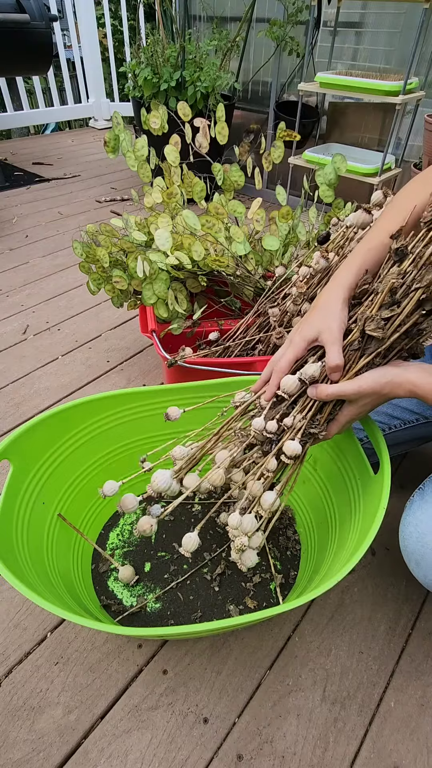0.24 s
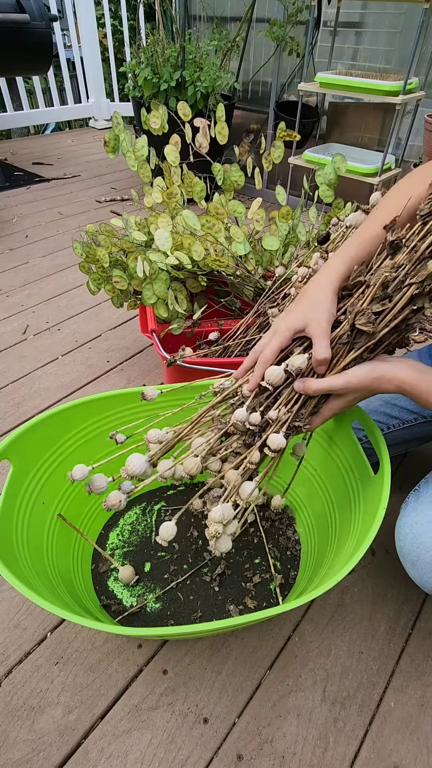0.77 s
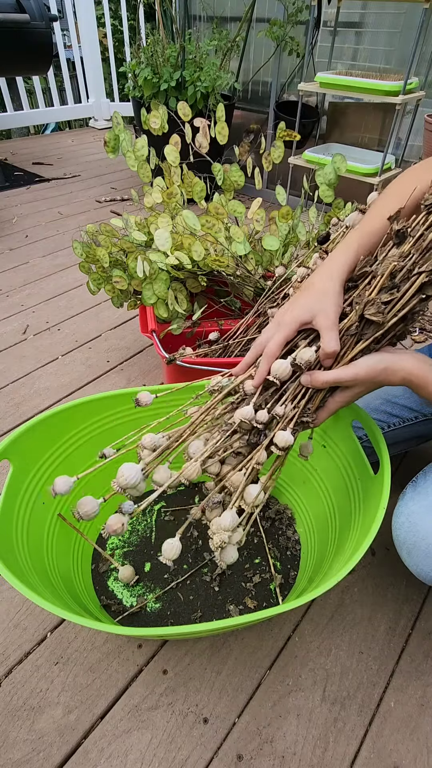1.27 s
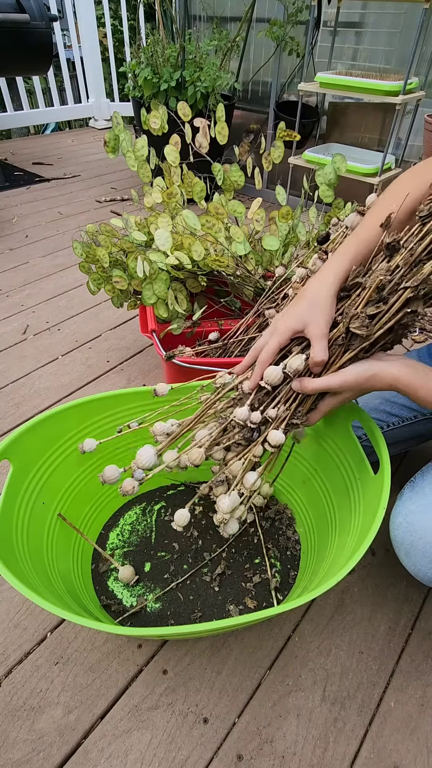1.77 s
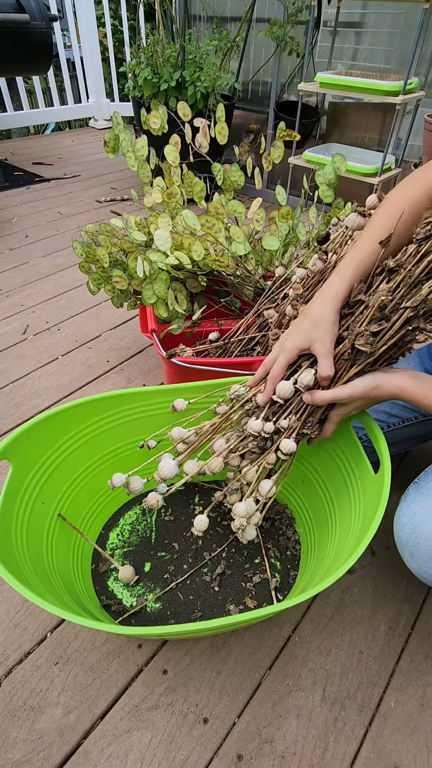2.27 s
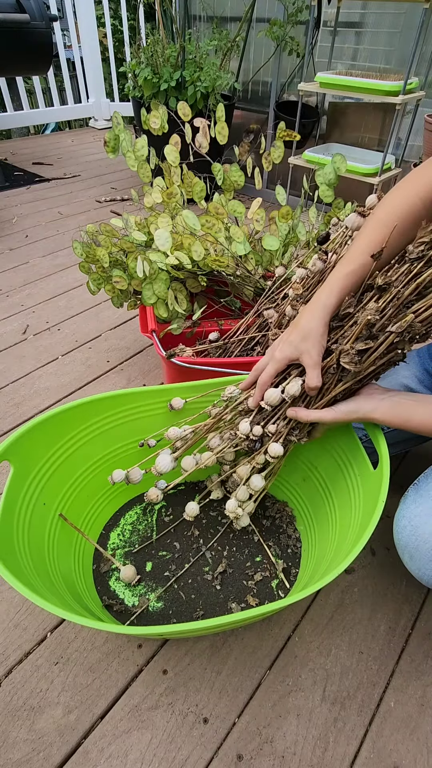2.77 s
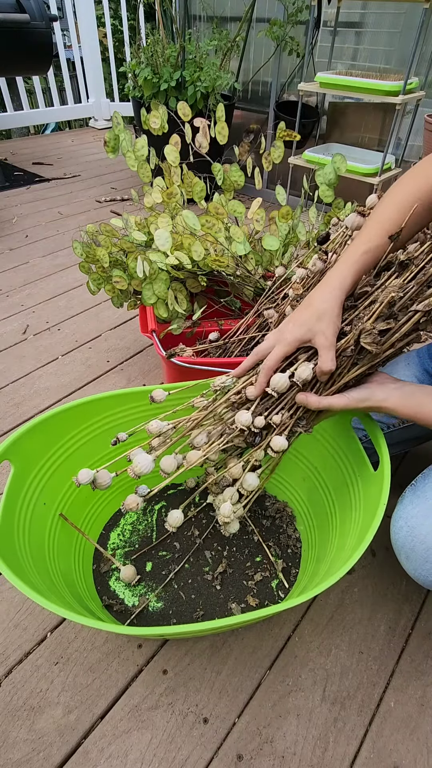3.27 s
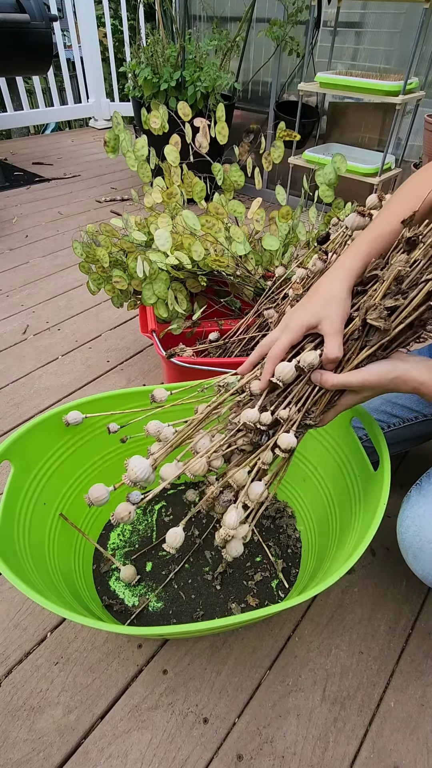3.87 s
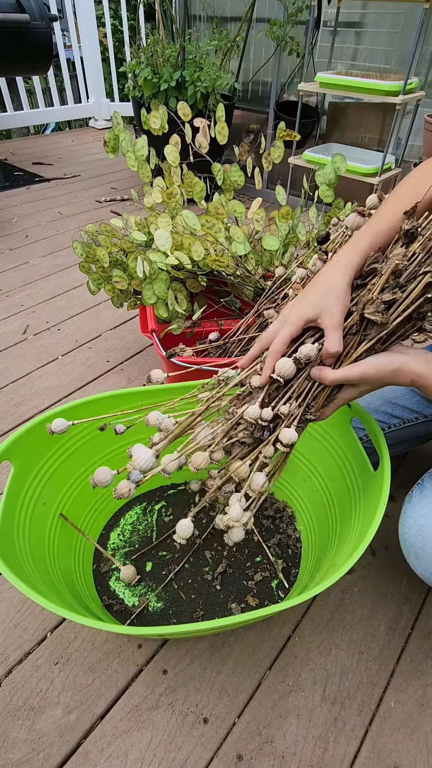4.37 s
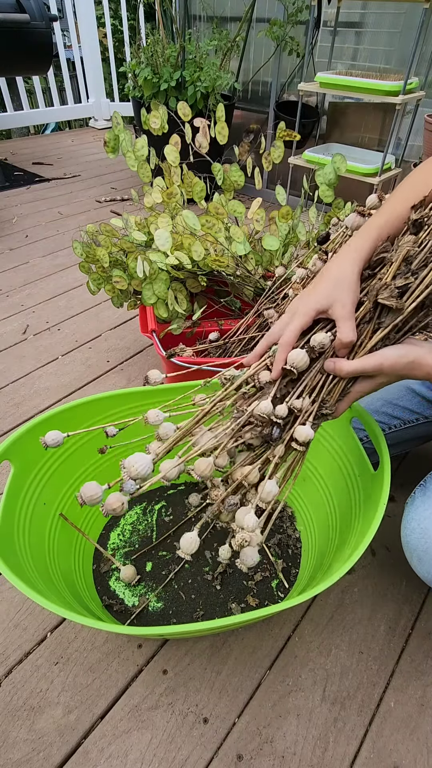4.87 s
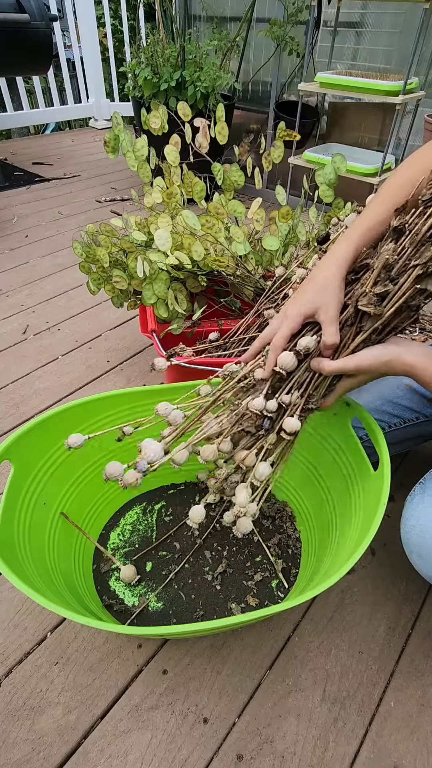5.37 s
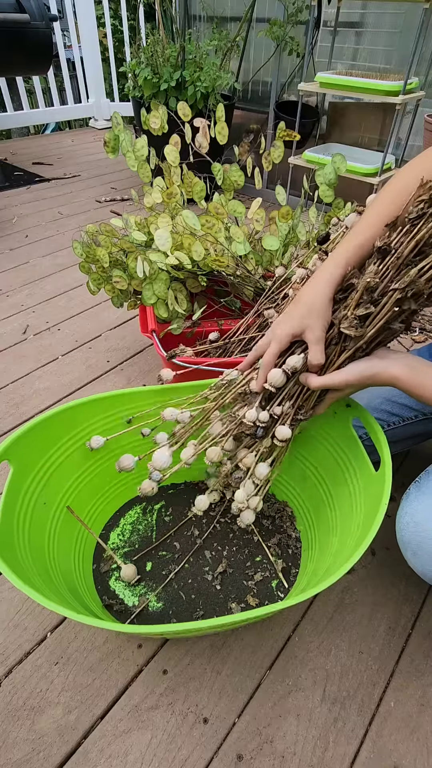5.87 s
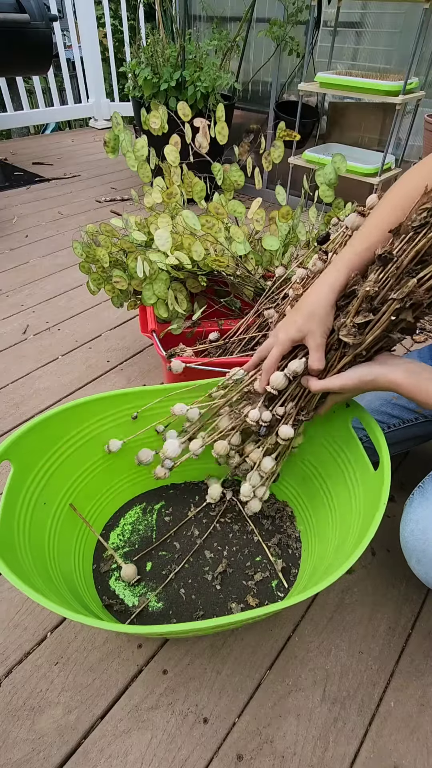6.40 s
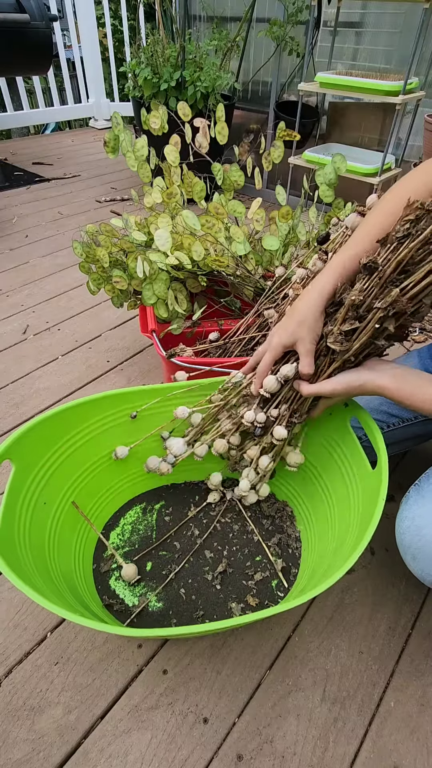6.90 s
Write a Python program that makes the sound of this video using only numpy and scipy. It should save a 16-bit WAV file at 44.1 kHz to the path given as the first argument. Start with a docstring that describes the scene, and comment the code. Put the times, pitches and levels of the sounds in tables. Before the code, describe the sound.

Close up outdoors, hands rub and shake a bundle of dry poppy stalks over a flexible plastic tub. Constant brittle crackle and fine seed hiss, pods rattling and occasionally bumping the wall. From about five seconds the bundle is beaten on the tub seven times, each a clattering cluster of hollow thuds. A faint low rumble and hum lie beneath.

```python
"""On an outdoor deck a low rumble and hum lie under everything, from first to last.
A bundle of dried poppies is rubbed and shaken over a soft plastic tub: filtered noise clicks make its crackle and hiss.
Seeds rattle in resonant pods, pods bump and drag on the tub's damped modes, and later dry fibres snap.
Last come seven beats on the tub wall, each a flam of pods landing one after another.
A phone with two microphone ports stands close by; it rides its gain and cuts the top."""
import sys
import numpy as np
from scipy import signal
from scipy.fft import rfft, irfft, next_fast_len
from scipy.io import wavfile
from scipy.ndimage import uniform_filter1d

SR = 44100
rng = np.random.default_rng(int(sys.argv[2]) if len(sys.argv) > 2 else 0)


def materialize(psi):
    """Save the field psi as 16-bit PCM at rate SR to the path in sys.argv[1].

    A 1-D psi becomes a single channel; in a 2-D psi each row is a channel.
    """
    bounded = np.clip(np.atleast_2d(psi).T, -1, 1)
    quanta = np.round(bounded * 32767).astype(np.int16)
    wavfile.write(sys.argv[1], SR, quanta)


N = 314874
TIME = np.arange(N) / SR


def undb(db):
    """Decibels to amplitude gain."""
    return 10 ** (np.asarray(db) / 20)


def read(points, hz):
    """A spectrum's dB at the given frequencies, interpolated over log frequency."""
    f, db = np.transpose(points)
    return np.interp(np.log(np.maximum(hz, 1)), np.log(f), db)


def colour(x, points, size=4096):
    """Minimum-phase filter of unit power with the given spectrum, so that attacks stay sharp."""
    gain = undb(read(points, np.linspace(0, SR / 2, size // 2 + 1)))
    cepstrum = irfft(np.log(gain / np.sqrt(np.mean(gain ** 2))))
    # fold the cepstrum onto positive time to make the filter causal
    cepstrum[1:size // 2] *= 2
    cepstrum[size // 2 + 1:] = 0
    impulse = irfft(np.exp(rfft(cepstrum)))
    return signal.oaconvolve(x, impulse[None])[:, :N]


def weigh(x, db_at):
    """Apply a gain that depends on frequency, without delay."""
    size = next_fast_len(N + SR // 10)
    gain = undb(db_at(np.fft.rfftfreq(size, 1 / SR)))
    return irfft(rfft(x, size) * gain, size)[..., :N]


# difference between the two ports: f/Hz, side minus mid level/dB
WIDTH = [(60, -13), (200, -19), (700, -9), (1300, -7.5), (2400, -5.5), (4400, 0.5), (8000, 0.5), (15000, 0)]


def noise_pair():
    """White noise at both ports: alike in the bass, unrelated in the treble."""
    mid, side = rng.standard_normal((2, N))
    side = weigh(side, lambda hz: read(WIDTH, hz))
    return np.array([mid + side, mid - side])


def bursts(times, sizes, fade_s):
    """Envelope of sudden bursts that fade exponentially and add in power."""
    starts = np.clip(times * SR, 0, N - 1).astype(int)
    power = np.bincount(starts, sizes ** 2, N)
    decay = np.exp(-2 / (fade_s * SR))
    return np.sqrt(signal.lfilter([1], [1, -decay], power + 1e-18))


def patter(rate, scatter_db, fade_s):
    """A stream of tiny noise clicks, rate per second, many weak and a few strong; envelope rms 1."""
    due = rng.random(N) < rate / SR
    sizes = undb(abs(scatter_db) * np.minimum(rng.exponential(size=N), 4))
    envelope = bursts(TIME[due], sizes[due], fade_s)
    return noise_pair() * envelope / np.sqrt(np.mean(envelope ** 2))


def resonate(x, hz, width_hz):
    """One resonance that keeps the power of white noise."""
    b, a = signal.iirpeak(hz, hz / width_hz, fs=SR)
    return signal.lfilter(b, a, x) * np.sqrt(SR / (np.pi * width_hz))


def add(out, s, sound):
    """Mix a sound in from time s."""
    start = int(np.clip(s * SR, 0, N - 1))
    out[..., start:start + sound.shape[-1]] += sound[..., :N - start]


def swell(middle_s, half_s):
    """A smooth Gaussian rise and fall around a moment, top 1."""
    return np.exp(-((TIME - middle_s) / half_s) ** 2)


def walk(hz):
    """Random levels held 1 / hz s and slewed; spread near 1."""
    hold = int(SR / hz)
    held = rng.standard_normal(N)[np.arange(N) // hold]
    return 1.2 * uniform_filter1d(held, hold)


# far rumble, steady colour: f/Hz, relative level/dB per Hz
RUMBLE = [(20, -10), (40, 2.5), (60, -3.5), (85, 3), (135, -7.5), (170, -17), (300, -25.5), (600, -27),
          (1500, -29), (5000, -26.5)]
# deep background that swells and sinks: t/s, level/dB
SWELL = [(0, -55), (.75, -50), (2.05, -47), (3.55, -58), (4.0, -50), (4.65, -61), (5.6, -45.5), (6.55, -69),
         (7.14, -55)]
# colour of that swell: f/Hz, relative level/dB per Hz
SURGE = [(60, -18.5), (95, 2.5), (135, 0), (170, -15.5), (215, -10.5), (300, -29), (600, -41.5)]


def outdoors(hum_hz=52, hum_width_hz=4, hum_db=-49, rumble_db=-47):
    """Far rumble that swells and sinks, with a machine's hum: a steady sine plus narrow noise that wavers."""
    waver = resonate(resonate(noise_pair(), hum_hz, hum_width_hz), hum_hz, hum_width_hz)
    steady = np.sqrt(2) * np.sin(2 * np.pi * hum_hz * TIME)
    hum = steady + .5 * waver / np.std(waver)
    surge = undb(np.interp(TIME, *np.transpose(SWELL))) * colour(noise_pair(), SURGE)
    rumble = undb(rumble_db) * colour(noise_pair(), RUMBLE)
    return rumble + surge + undb(hum_db) * hum


# how hard the hands work the bundle, before the layer gains: t/s, stalk level/dB, seed level/dB
HANDLING = [(0, -37, -45), (.6, -38.5, -43.5), (1.0, -38, -43), (1.72, -37, -45.5), (1.92, -44.5, -56),
            (2.04, -40.5, -46), (2.32, -46.5, -52), (2.48, -41.5, -47.5), (2.7, -38.5, -45),
            (2.82, -41.5, -47), (3.07, -39.5, -50), (3.2, -43.5, -48.5), (3.5, -37, -40),
            (3.85, -37.5, -42.5), (4.35, -40.5, -45), (4.8, -38.5, -45), (5.1, -46, -53),
            (7.14, -49.5, -50.5)]
FLICKER_HZ, FLICKER_DB = 16, .5  # both levels waver unevenly
# every jolt of a pod stirs the stalks and sheds seeds (dB relative to the jolt's table level)
STIR_DB, SHED_DB, STIR_FADE_S = -23, -25, .03
# the bundle swishes on the way down before each beat, and settles after it
SWING_LEAD_S, SWING_S, SWING_STALK_DB, SWING_SEED_DB = .042, .052, -43.5, -46.5
SETTLE_LAG_S, SETTLE_S, SETTLE_STALK_DB, SETTLE_SEED_DB = .06, .075, -42, -45


def motion():
    """Strength of stalk rubbing and seed spilling: handling, jolts, swings and settling add in power."""
    s, stalk_db, seed_db = np.transpose(HANDLING)
    flicker_db = FLICKER_DB * walk(FLICKER_HZ)
    jolt_s, jolt_db, _, _ = np.transpose(RATTLES)
    jolts = bursts(jolt_s, undb(jolt_db), STIR_FADE_S)
    swing = sum(swell(beat[0] - SWING_LEAD_S, SWING_S) for beat in BEATS)
    settle = sum(swell(beat[0] + SETTLE_LAG_S, SETTLE_S) for beat in BEATS)

    def strength(hand_db, stir_db, swing_db, settle_db):
        hands = undb(np.interp(TIME, s, hand_db) + flicker_db)
        parts = [hands, undb(stir_db) * jolts, undb(swing_db) * swing, undb(settle_db) * settle]
        return np.linalg.norm(parts, axis=0)

    rubbing = strength(stalk_db, STIR_DB, SWING_STALK_DB, SETTLE_STALK_DB)
    spilling = strength(seed_db, SHED_DB, SWING_SEED_DB, SETTLE_SEED_DB)
    return rubbing, spilling


def ticks(low_hz, high_hz, count):
    """Single seeds and splinters tick as fading sines, each with its own pitch and port phase; rms 1."""
    out, t = np.zeros((2, N)), TIME[:SR // 70]
    for when, pitch, force, place in rng.random((count, 4)):
        cycles = low_hz * (high_hz / low_hz) ** pitch * t
        fading_db = 20 * force ** 2 - 2.1 * cycles  # 2.1 dB lost per cycle
        port_cycles = cycles + np.array([[0], [place]])
        add(out, when * N / SR, undb(fading_db) * np.sin(2 * np.pi * port_cycles))
    return out / np.std(out)


# colour of rubbing stalks: f/Hz, relative level/dB per Hz
STALKS = [(150, -24), (400, -18.5), (700, -8), (1050, -8.5), (1500, -4.5), (2250, -1.5), (2800, 0.5),
          (4300, 2.5), (5200, -7), (7500, -11), (9000, -21), (16000, -6.5)]
# colour of loose seeds, also of snapping fibres: f/Hz, relative level/dB per Hz
SEEDS = [(2000, -37), (6000, 3), (9000, -8.5), (11000, -3), (12500, 2), (14500, 3), (16000, -16)]


def bundle(count=150):
    """Stalks crackle, loose seeds hiss and tick, and pods jostle at random as hard as the bundle moves."""
    rubbing, spilling = motion()
    crackle = patter(rate=1500, scatter_db=3, fade_s=.001)
    stalks = colour(crackle * rubbing * undb(-2.5), STALKS)
    hiss = patter(rate=3000, scatter_db=.5, fade_s=.00042)
    seeds = colour(hiss * spilling * undb(-1), SEEDS)
    splinters = undb(-5.5) * rubbing * ticks(low_hz=1940, high_hz=6000, count=1500)
    pings = undb(-6.5) * spilling * ticks(low_hz=11560, high_hz=15300, count=1200)
    when, force, size, length = rng.random((count, 4)).T
    when = when * N / SR
    shell_hz = 1900 * 2.4 ** (size ** 2)  # low pitches are commoner
    rubbing_db = 20 * np.log10(np.interp(when, TIME, rubbing))
    jostles = np.transpose([when, rubbing_db - 6.5 + 5 * force, shell_hz, .0084 + .021 * length])
    jostling = pods(jostles, shell_width_hz=170, shell_db=-10.5)
    return stalks + seeds + splinters + pings + jostling


# a pod jolts and its seeds hit the shell: t/s, level/dB before the layer gain, shell pitch f/Hz, fade/s
RATTLES = [(.0697, -13, 3180, .008), (.128, -20.5, 2100, .011), (.179, -19.5, 2120, .013),
           (.2955, -15, 1990, .01), (.4048, -20, 3930, .014), (.533, -25, 3830, .027),
           (.8093, -22, 4300, .017), (.9443, -22, 4510, .0074), (.9535, -21, 2650, .014),
           (1.0838, -20, 2290, .014), (1.2231, -24, 2800, .016), (1.2903, -23.5, 4270, .011),
           (1.311, -20.5, 2820, .0077), (1.3495, -21, 1940, .01), (1.4431, -24.5, 2300, .021),
           (1.492, -21, 2170, .014), (1.5768, -26, 2400, .027), (1.6387, -22, 3300, .009),
           (1.724, -16, 2400, .009), (1.7828, -12, 2620, .006), (1.8735, -26, 2230, .009),
           (2.0153, -21, 4160, .005), (2.885, -26, 3520, .025), (3.0494, -23.5, 3100, .009),
           (3.0891, -18, 2750, .006), (3.556, -22, 4360, .016), (3.7095, -24, 3580, .016),
           (3.8245, -19.5, 2180, .014), (3.8638, -18, 2390, .0077), (3.9586, -26.5, 2180, .013),
           (4.088, -26, 3900, .021), (4.124, -19, 2250, .009), (4.2134, -24, 2260, .014),
           (4.4418, -26, 2210, .018), (4.5553, -20, 3350, .0052), (4.5795, -25, 2220, .014),
           (4.631, -16, 3060, .008), (4.739, -20.5, 4300, .005), (4.758, -16, 2420, .005),
           (4.7855, -22, 1700, .01), (4.875, -24, 2400, .02), (5.0284, -29, 4350, .022),
           (5.3278, -23, 2230, .0096), (5.3722, -23.5, 2500, .008), (5.454, -25, 3330, .014),
           (5.7135, -25, 2140, .013), (6.3205, -28, 2260, .025), (6.4475, -21, 2060, .0078),
           (6.5525, -28, 3080, .018), (6.5892, -21, 1940, .0065), (6.696, -22, 2040, .009),
           (6.8256, -17, 2970, .0044), (6.84, -18, 3350, .007), (7.0693, -27, 2380, .008)]
# colour of pod shells: f/Hz, relative level/dB per Hz
SHELL = [(300, -9), (900, -8.5), (1600, 0), (2600, 0.5), (4300, -1.5), (5300, -5.5), (7500, -7.5),
         (9000, -17), (12500, -3), (16000, -13.5)]


def pods(rows, shell_width_hz, shell_db):
    """Seeds pelt the inside of a pod; its shell rings at its own pitch."""
    out, t = np.zeros((2, N)), TIME[:SR // 10]
    pelting = patter(rate=5000, scatter_db=1.8, fade_s=.0003)
    onset = 1 - np.exp(-t / .0004)
    for s, db, hz, fade_s in rows:
        start = int(np.clip(s * SR, 0, N - len(t)))
        jolt = pelting[:, start:start + len(t)] * onset * np.exp(-t / max(fade_s, .001))
        ring = undb(shell_db) * resonate(jolt, hz, shell_width_hz)
        add(out, s, undb(db) * (jolt + ring))
    return colour(out, SHELL)


def ring_time(hz):
    """Soft plastic damps its high modes sooner: time to fall 60 dB, in s."""
    return .125 * (800 / hz) ** .4


# a single pod bumps the tub: t/s, level/dB before the part gains, wall pitch at that spot f/Hz,
# crack of the shell relative level/dB, boom of the whole tub relative level/dB
KNOCKS = [(.165, -31.5, 950, -6, -8), (.362, -34.5, 935, -6.5, -20), (.884, -31, 706, -19, -14),
          (.891, -24, 846, -16, -14), (1.161, -19.5, 754, -15, -27), (1.176, -19, 800, -9, -19),
          (1.381, -14, 790, -20, -18), (1.432, -29, 1110, -2, -14), (1.491, -32.5, 1180, -6, -16),
          (2.343, -38.5, 1070, -14, -14), (2.682, -22, 1080, -10.5, -28), (2.698, -23.5, 1010, 2, -16),
          (2.713, -23, 1060, -12, -27), (2.765, -34, 980, -1, -21), (3.886, -29.5, 690, -3.5, 0),
          (5.864, -25, 870, -5, -11), (5.872, -14, 1026, -13, -8), (6.612, -29, 685, 2, -18)]
# modes of the tub: f/Hz, relative level/dB
TUB = [(132, -5.5), (196, -5), (217, -1), (250, -4.5), (288, 1.5), (312, 2), (357, 2.5), (420, -5.5),
       (478, -12.5), (536, -4), (566, 0.5), (666, 7.5), (728, 5), (760, 2), (792, 2), (868, 5), (950, -3.5),
       (1020, -13.5), (1081, 5), (1150, 7.5), (1185, -0.5), (1240, 1.5), (1502, 1), (1590, -6), (1740, -1),
       (1993, -15.5)]


def tub(landings, ring_db=-23, boom_db=-15, wall_db=2):
    """Each pod dents the soft wall, which thuds briefly and rings the tub's modes in phases drawn per landing."""
    out, t = np.zeros(N), TIME[:SR // 4]
    hz, db = np.transpose(TUB)
    fading_db = db[:, None] - 60 * t / ring_time(hz[:, None])
    modes = undb(fading_db) * np.exp(2j * np.pi * hz[:, None] * t)
    whole_body = hz < 500  # the low modes take the boom level
    wall_t60_s, push_s = .028, .0006
    dent = 1 - np.exp(-t / push_s)  # the soft wall takes a moment to give
    phases = np.exp(2j * np.pi * rng.random((len(landings), len(TUB))))
    for (s, peak_db, wall_hz, _, heavy_db), phase in zip(landings, phases):
        thud = undb(wall_db - 60 * t / wall_t60_s) * np.sin(2 * np.pi * wall_hz * t)
        mode_gains = undb(np.where(whole_body, boom_db + heavy_db, ring_db))
        ring = (phase * mode_gains) @ modes
        add(out, s, undb(peak_db) * dent * (thud + ring.imag))
    return out


# colour of shells cracking on the wall: f/Hz, relative level/dB per Hz
CRACK = [(150, -31), (500, -0.5), (750, 0), (1200, 2), (1500, 0), (2100, -0.5), (2500, -4), (3300, -2.5),
         (4800, -12.5), (7500, -19), (9000, -26.5), (12500, -17), (16000, -17.5)]


def shells(landings):
    """The landing pods crack in short noise bursts, a longer clatter fades with them, and seeds spray out."""
    s, peak_db, _, crack_db, _ = np.transpose(landings)
    force = undb(peak_db + crack_db)
    crack = noise_pair() * bursts(s, force, fade_s=.0042)
    clatter = patter(rate=1800, scatter_db=1.2, fade_s=.0014) * bursts(s, force, fade_s=.012)
    grains = patter(rate=900, scatter_db=2.2, fade_s=.0011)
    spray = grains * bursts(s, force * undb(-13), fade_s=.036)
    impact = undb(6) * crack + undb(-4) * clatter
    return colour(impact, CRACK) + colour(spray, SHELL)


# pods dragged along the tub wall swell and fade: middle t/s, half length/s, level/dB
DRAGS = [(.185, .026, -43), (.318, .022, -47), (2.57, .09, -45), (2.72, .06, -41.5), (2.98, .14, -49)]
# colour of the scraping: f/Hz, relative level/dB per Hz
SCRAPE = [(120, -22), (300, -9), (440, -8), (530, -1), (700, -11), (1080, 1), (1350, -42), (2000, -6.5),
          (5000, -22.5)]


def drag():
    """Pods stick and slip along the ribbed wall and set the tub ringing."""
    pressure = sum(undb(db) * swell(s, half_s) for s, half_s, db in DRAGS)
    slips = patter(rate=500, scatter_db=1.5, fade_s=.0013) * pressure
    ringing = 0
    for hz, mode_db in TUB:
        width_hz = np.log(1000) / (np.pi * ring_time(hz))  # bandwidth that gives this ring time
        ringing = ringing + undb(mode_db) * resonate(slips, hz, width_hz)
    return colour(slips, SCRAPE) + undb(-18) * ringing


# a dry fibre snaps with a bright tick: t/s, level/dB
SNAPS = [(2.6973, -30), (3.276, -27.5), (3.6696, -29), (3.8881, -32), (4.4458, -32), (4.89, -32)]


def snaps():
    """Dry fibres break with a short burst of treble."""
    s, db = np.transpose(SNAPS)
    return colour(noise_pair() * bursts(s, undb(db), fade_s=.005), SEEDS)


# the bundle is beaten on the wall, levels before the part gains: first contact t/s, flam length/s,
# level of its pods/dB, growth from first to last/dB, boom of the tub relative level/dB,
# hard landing t/s, its level/dB, wall pitch there f/Hz
BEATS = [(5.25, .032, -6.5, 0, -8, 5.254, -.5, 880), (5.529, .028, -7.5, 2, -9, 5.559, -5, 1120),
         (5.798, .029, -8.5, 8, -5.5, 5.818, .5, 1040), (6.077, .026, -13.5, 1.5, -3, 6.104, -5, 744),
         (6.351, .038, -12.5, 0, -5, 6.385, -2.5, 1126), (6.622, .038, -11, -2, -7, 6.639, -5, 1096),
         (6.886, .03, -12.5, 3, -5.5, 6.915, -2, 1122)]
# the first and last pods are lighter; jitter as a share of the gap
FLAM_EDGE_DB, FLAM_SCATTER_DB, FLAM_JITTER = -3.5, 1.5, .2
# wall pitch under the leading pod, and range under the others
FIRST_SPOT_HZ, SPOT_LOW_HZ, SPOT_HIGH_HZ = 790, 700, 1230
FLAM_CRACK_DB, HARD_CRACK_DB, HARD_BOOM_DB = -6.5, -13.5, -16  # relative to each landing's level
CRACK_SCATTER_DB = 3.5  # pods land square or glancing
# one loose pod drops after each flam
STRAGGLER_LAG_S, STRAGGLER_SPREAD_S, STRAGGLER_DB = .075, .012, -29


def flams(count=5):
    """Each beat lands a row of pods, one hard pod and a straggler; rows like those of KNOCKS."""
    rows, along = [], np.linspace(0, 1, count)
    after_first = along > 0
    chances = rng.uniform(-1, 1, (len(BEATS), 4, count))
    for beat, (late, force, spot, square) in zip(BEATS, chances):
        s, length_s, db, growth_db, boom_db, hard_s, hard_db, hard_hz = beat
        times = s + length_s * (along + after_first * late * FLAM_JITTER / (count - 1))
        edge_db = FLAM_EDGE_DB * (2 * along - 1) ** 2
        levels = db + growth_db * (along - .5) + edge_db + FLAM_SCATTER_DB * force
        spot_hz = np.interp(spot, [-1, 1], [SPOT_LOW_HZ, SPOT_HIGH_HZ])
        pitches = np.where(after_first, spot_hz, FIRST_SPOT_HZ)
        cracks = FLAM_CRACK_DB + CRACK_SCATTER_DB * square * after_first
        rows += [(*pod, boom_db) for pod in zip(times, levels, pitches, cracks)]
        rows.append((hard_s, hard_db, hard_hz, HARD_CRACK_DB, HARD_BOOM_DB))
        straggler_s = s + STRAGGLER_LAG_S + STRAGGLER_SPREAD_S * late[0]
        rows.append((straggler_s, STRAGGLER_DB, spot_hz[0], FLAM_CRACK_DB, boom_db))
    return rows


def scene():
    """All sources at the two ports of the phone close by."""
    landings = list(KNOCKS) + flams()
    rattles = undb(-11.5) * pods(RATTLES, shell_width_hz=240, shell_db=-7)
    handled = bundle() + rattles + snaps()
    struck = tub(landings) + shells(landings) + drag()
    return handled + struck + outdoors()


def gain_control(x, threshold_db=-15, recover_db_per_s=5):
    """Loud blows push the gain down at once, by half their excess in dB; it creeps back afterwards."""
    power = uniform_filter1d(np.mean(x ** 2, axis=0), SR // 100)
    level_db = 10 * np.log10(np.abs(power) + 1e-18)
    over_db = np.maximum(level_db - threshold_db, 0) / 2
    recovery = recover_db_per_s * TIME
    return x * undb(recovery - np.maximum.accumulate(over_db + recovery))


# colour of the two microphone ports: f/Hz, left minus right level/dB
PORTS = [(60, 0.1), (350, 3.5), (700, 1.7), (1300, 1.8), (2400, -2), (3400, -8), (4600, -6), (6000, 8.5),
         (8100, 18.5), (11000, 9), (15000, 6)]
TOP_HZ = 15850


def record(dry):
    """Each port has its own colour; the phone rides its gain, clips at full scale and cuts the top."""
    def port_db(hz):
        lean = read(PORTS, hz) * np.array([[1], [-1]]) / 2
        return lean - 10 * np.log10(np.mean(undb(lean) ** 2, axis=0))  # keep the ports' mean power

    held = np.clip(gain_control(weigh(dry, port_db)), -1, 1)
    top_cut = signal.ellip(10, .2, 80, TOP_HZ, fs=SR, output="sos")
    return signal.sosfilt(top_cut, held)


dry = scene()
out = record(dry)
materialize(out)
```